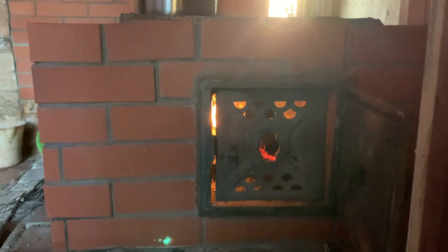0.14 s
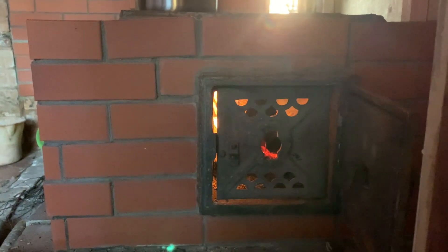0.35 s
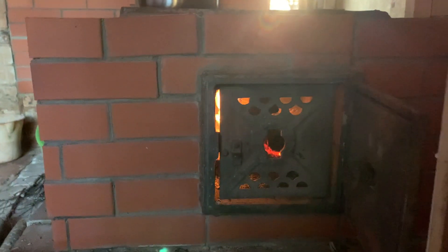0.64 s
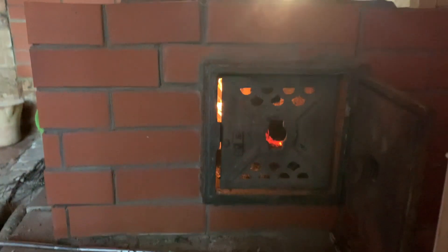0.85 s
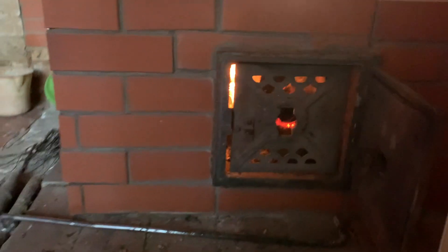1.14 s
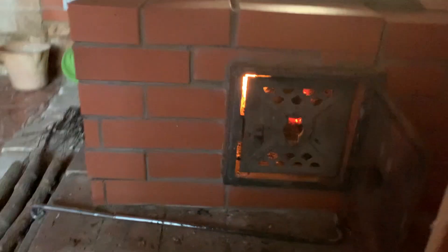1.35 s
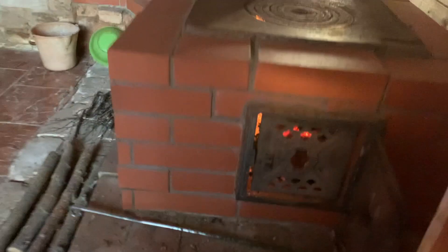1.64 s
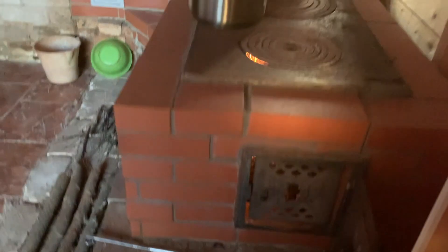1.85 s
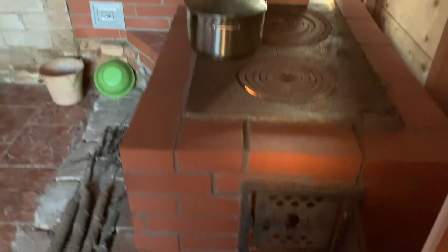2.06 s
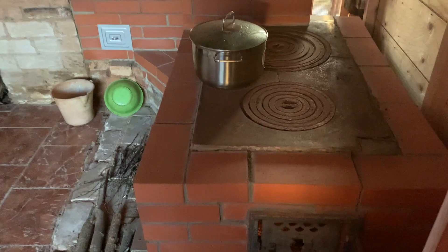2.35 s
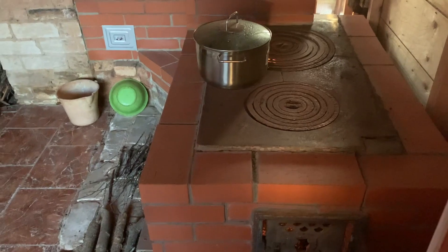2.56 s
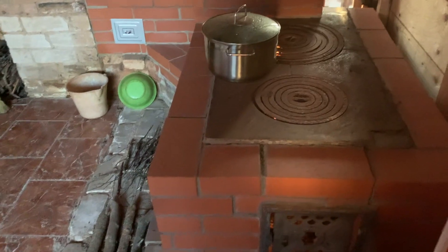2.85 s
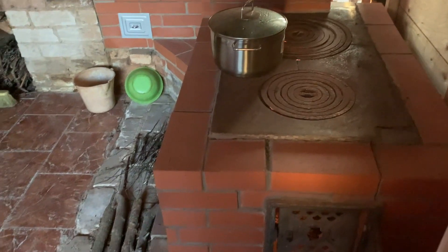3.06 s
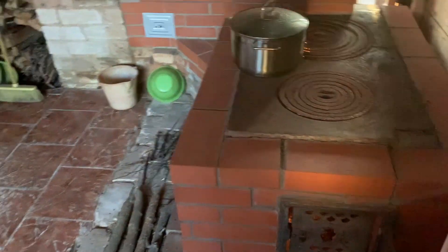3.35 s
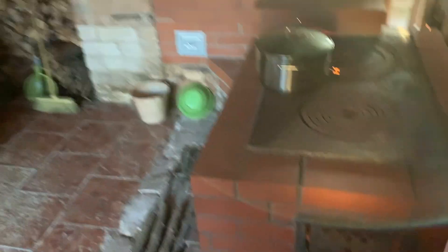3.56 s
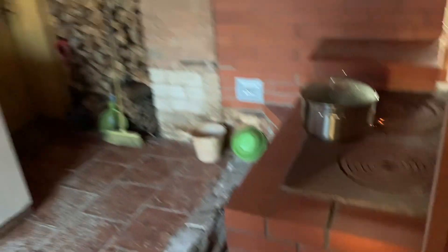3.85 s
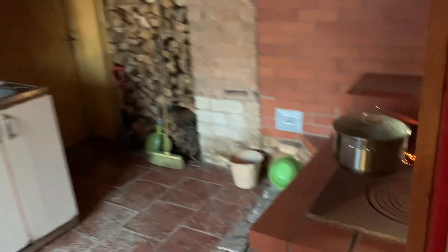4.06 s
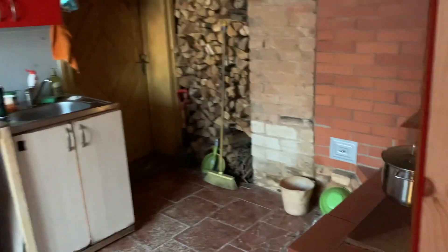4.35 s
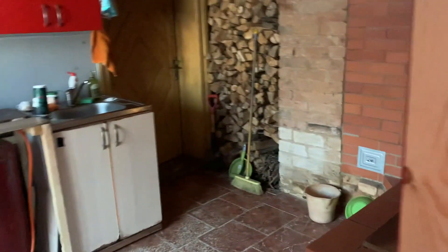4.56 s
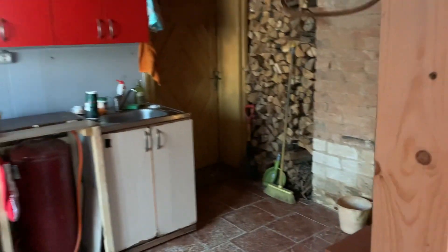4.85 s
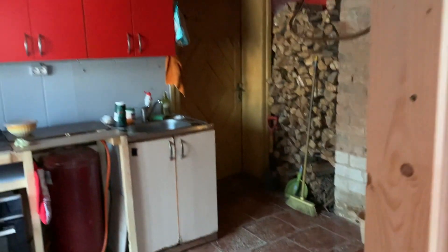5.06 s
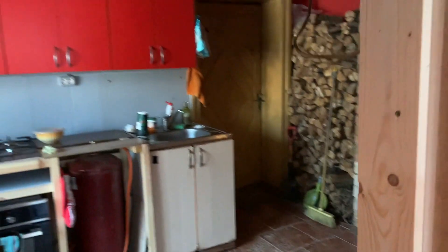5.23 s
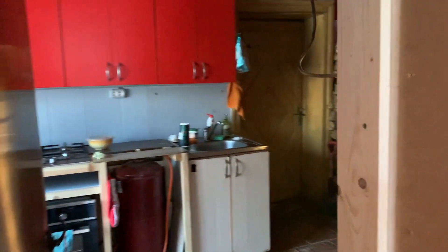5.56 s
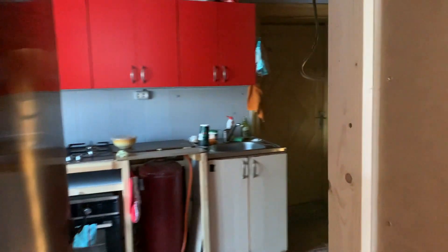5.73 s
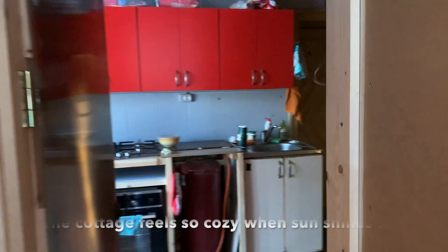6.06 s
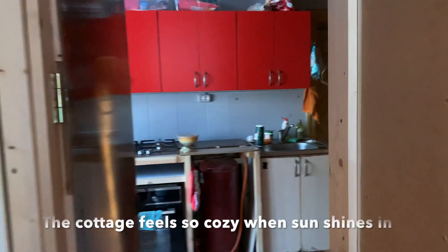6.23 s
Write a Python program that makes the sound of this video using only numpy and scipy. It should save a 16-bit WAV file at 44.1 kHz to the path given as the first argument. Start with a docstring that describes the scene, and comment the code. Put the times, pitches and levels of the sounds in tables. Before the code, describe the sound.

A wood fire burns in a brick kitchen stove, with a low fluttering roar and scattered sharp crackles.

```python
"""A low, fluttering roar with sharp crackles: a wood fire in a brick stove in a small cottage kitchen.
The flames make the air in the firebox and flue (the chimney pipe) ring at several pitches.
Logs puff out gas and snap as their fibres part, over a faint hiss of steam and embers.
Two microphones hear it; the crackles and hiss reach the left one a little earlier."""
import sys
import numpy as np
from scipy import signal
from scipy.fft import rfft, irfft, next_fast_len
from scipy.io import wavfile

SR = 44100
rng = np.random.default_rng(int(sys.argv[2]) if len(sys.argv) > 2 else 0)


def store_pcm(level_fs):
    """Save levels as 16-bit WAV."""
    pcm = np.round(np.clip(level_fs, -1, 1) * 32767).astype(np.int16)
    wavfile.write(sys.argv[1], SR, np.atleast_2d(pcm).T)


N = 282238

# Modes, the pitches at which the air in firebox and flue rings, in a low, a middle and a high group.
# Each row: pitch in Hz, width in Hz, gain in dB.
LOW_MODES = [(63.2, 17.4, -2), (104.1, 12.2, 1), (120.64, 19.9, 0.5), (133.5, 24.3, -1), (150.3, 27, -9.5)]
MIDDLE_MODES = [(208.9, 12.7, -4), (242, 22, -7.5), (294, 10.64, 2), (378.6, 62, -9), (470, 117, -19.5)]
HIGH_MODES = [(522.3, 21, 0), (685, 29, -2.5), (810, 60, -10.5), (1011, 70, -11), (1145, 82, -15.5),
              (1480, 230, -28.5), (2034, 230, -37.5)]


def flue_rumble(level_db):
    """Slowly released heat drives the lowest modes; the walls swallow anything higher."""
    air = ring_modes(rng.standard_normal((2, N)), LOW_MODES)
    common, apart = butter(butter(air, 3, 165), 3, 44, "high")
    apart = signal.lfilter([1, -1], [1], apart)   # the two sides differ more as pitch rises
    return from_db(level_db + 1.42 * drift(hz=9.3)) * stereo(rms_one(common), rms_one(apart), -18.5)


def flame_drone(level_db, burn):
    """The middle modes hum, gently following the flares of burning gas."""
    noise = rng.standard_normal((2, N)) * burn ** 0.42 * from_db(1.98 * drift(hz=37))
    common, apart = rms_one(ring_modes(noise, MIDDLE_MODES))
    spread_db = 18.5 * bump(at_s=4.2, width_s=0.24)   # the drone widens as the listener turns away
    return from_db(level_db) * stereo(common, apart * from_db(spread_db), -12.0)


def flame_flutter(level_db, burn):
    """Flames flutter in the high modes; strong flares reach the highest ones most."""
    noise = rng.standard_normal((2, N))
    out, power = 0, 0
    for k, (hz, width, db) in enumerate(HIGH_MODES):
        brighten_db = 1.1 * (level_db - level_db.mean()) * np.log2(hz / 700)   # louder is brighter
        flicker = rms_one(burn ** (0.76 + 0.5 * np.log2(hz / 500)))
        drive = noise * from_db(level_db + brighten_db) * flicker
        out += (-1) ** k * from_db(db) * resonate(drive, hz, width)
        power += from_db(2 * db) * width * np.pi / SR
    return butter(out, 4, 2500) / np.sqrt(power)


def gas_flares(per_s, fade_s):
    """Pockets of gas catch fire at random and die away over a steady burn."""
    lit = (rng.random(N) < per_s / SR) * np.minimum(rng.exponential(1, N), 2.2)
    return 0.48 + signal.lfilter([1], [1, -np.exp(-1 / (fade_s * SR))], lit)


def flame_lulls():
    """The flames die back briefly: smooth dips of the level, in dB."""
    # Each row: middle of the dip in seconds, depth in dB, length in seconds.
    lulls = [(0.201, 6.5, 0.027), (0.53, 6.5, 0.019), (1.008, 8, 0.035), (1.127, 8, 0.042),
             (1.167, 13, 0.031), (1.318, 17.5, 0.02), (1.429, 17, 0.012), (1.581, 18, 0.015),
             (2.296, 4.5, 0.016), (2.577, 12.5, 0.046), (3.116, 10, 0.054), (3.834, 10.5, 0.036),
             (4.371, 9.5, 0.037), (4.806, 12, 0.064), (5.066, 5.5, 0.11), (5.681, 12, 0.018),
             (5.874, 16, 0.039), (6.305, 10.5, 0.048)]
    return -sum(db * bump(s, length_s / 2) for s, db, length_s in lulls)


def gas_puffs():
    """A log puffs out gas: one push of pressure and a short trail of noise ring in the stove."""
    # Each row: start in seconds, level in dB, treble in dB relative to that level.
    puffs = [(0.0315, -48.5, -6), (0.115, -54.5, -2), (0.283, -52, -23), (0.434, -63.5, 5),
             (0.4935, -55.5, -3), (0.57, -50.5, -22), (0.601, -48.5, -32), (0.646, -57, 0), (0.694, -63, 0),
             (0.887, -51.5, -33), (1.0587, -42.5, -29), (1.128, -53.5, -16), (1.181, -62, 17),
             (1.216, -55.5, 3), (1.347, -48.5, -20), (1.4514, -48.5, -18), (1.598, -48, -9),
             (1.7032, -51, -19), (1.732, -44.5, -27), (1.847, -49, -20), (1.992, -53, -23),
             (2.169, -50.5, -21), (2.226, -58, 5), (2.338, -45.5, -17), (2.369, -49, -32), (2.457, -57, -4),
             (2.504, -47, -15), (2.66, -65, -1), (2.713, -46.5, -7), (2.802, -48, -18), (2.888, -47, -1),
             (2.951, -54, -1), (3.059, -49.5, -2), (3.288, -46, -4.5), (3.339, -50, -31), (3.405, -44.5, 2),
             (3.454, -57, -1), (3.482, -62, -15), (3.571, -55, -10), (3.6, -51.5, 0), (3.643, -50.5, -19),
             (3.7147, -40.5, -13), (3.767, -51.5, -5), (3.869, -53, -11), (3.8996, -44.5, -10),
             (3.971, -42, -9), (3.995, -51.5, -4), (4.047, -50, -18), (4.0957, -53, -24), (4.188, -46, -15),
             (4.275, -51.5, -7), (4.315, -65, 6), (4.3846, -58, -24), (4.43, -52, 0), (4.444, -42, -21),
             (4.537, -53.5, -19), (4.689, -49, -23), (4.73, -53, -16), (4.87, -57, -13), (4.92, -54.5, -26),
             (4.994, -50.5, -9), (5.709, -64, -13), (5.252, -51.5, -25), (5.3425, -51, -4.5),
             (5.399, -60, -10), (5.494, -54, -25), (5.762, -54, -3), (5.808, -48.5, -37),
             (5.8997, -56.5, -22), (6.064, -56, -1), (6.112, -57.5, -17), (6.16, -53, -32),
             (6.202, -55, -21)]
    length = SR // 6
    bursts = rng.standard_normal((len(puffs), 2, length)) * from_db(-60 * np.arange(length) / SR / 0.074)
    bursts[..., 0] += from_db(25.5)   # the opening push
    dull = resonate(bursts, hz=737, width_hz=40) + from_db(6.0) * ring_modes(bursts, HIGH_MODES)
    dull += from_db(-8.5) * band(bursts, 520, 1077)
    low = from_db(8.0) * ring_modes(bursts, MIDDLE_MODES) + from_db(7.5) * ring_modes(bursts, LOW_MODES)
    body = butter(dull + low, 3, 1800)
    treble = butter(band(bursts, 900, 1730), 5, 2500)
    out = np.zeros((2, N))
    for k, (s, db, treble_db) in enumerate(puffs):
        puff = body[k] / peak(dull[k, 0]) + from_db(treble_db) * treble[k] / peak(treble[k, 0])
        add_at(out, s, from_db(db) * puff)
    return out


def wood_snaps():
    """Wood fibres part with a ping, a dry knock and a sizzle. Returns the snaps and a feed for the room."""
    # Each row: start in seconds, level in dB, ping pitch in Hz, knock in dB, knock pitch in Hz,
    # sizzle in dB, length in seconds. Knock and sizzle are relative to the level.
    snaps = [(0.0753, -26, 7230, -26, 2300, -12, 0.021), (0.22, -56.5, 6600, -20, 1750, -38, 0.015),
             (0.246, -58, 7900, -19, 1640, -15, 0.016), (0.278, -50, 6260, -8, 2160, -38, 0.018),
             (0.565, -51, 11200, -27, 1600, -39, 0.022), (0.743, -56.5, 8050, -24, 1630, -53, 0.0095),
             (0.835, -58, 7760, -10, 1790, -33, 0.012), (0.883, -57.5, 8060, -12, 1640, -23, 0.016),
             (0.9175, -37, 8030, -26, 4120, -85, 0.0093), (0.95, -60, 8050, -38, 1650, -45, 0.02),
             (1.1702, -47.5, 7450, -16, 2300, -22, 0.018), (1.182, -55.5, 7000, -1, 1900, -20, 0.044),
             (1.237, -56.5, 6220, -12, 1730, -32, 0.024), (1.264, -64, 6300, -23, 1700, -42, 0.022),
             (1.381, -63, 7950, -23, 1700, -28, 0.018), (1.517, -48, 9000, -36, 1600, 2, 0.014),
             (1.745, -45, 7000, -10, 3380, 0, 0.02), (1.884, -48.5, 7800, -35, 1800, -22, 0.018),
             (2.049, -55, 7360, -35, 1700, -35, 0.027), (2.233, -45.5, 9600, -20, 1700, -3, 0.01),
             (2.245, -43.5, 9000, -23, 2300, -1, 0.0099), (2.336, -60, 8050, -21, 1750, 2, 0.024),
             (2.525, -51, 8500, -27, 1680, -10, 0.013), (2.628, -37, 8170, -26, 4420, -54, 0.01),
             (2.669, -50, 7950, -33, 1990, -10, 0.02), (2.6786, -33.5, 8750, -25, 1650, -7, 0.015),
             (2.703, -40, 8200, -8.5, 1720, -5, 0.016), (2.743, -51, 7100, -25, 1810, -18, 0.016),
             (2.793, -58.5, 7000, -25, 1700, -28, 0.02), (2.9666, -47.5, 6800, -24, 1700, -22, 0.016),
             (3.052, -51.5, 8200, -4, 1650, -15, 0.022), (3.086, -50.5, 8540, -25, 1660, -15, 0.021),
             (3.1874, -45, 8300, -30, 1700, -18, 0.019), (3.2836, -46, 10700, -30, 1690, -33, 0.016),
             (3.385, -58, 9000, -25, 1700, -18, 0.014), (3.4078, -30.5, 7060, -8.5, 1600, -17, 0.016),
             (3.544, -53.5, 8900, -20, 1720, -29, 0.012), (3.6037, -35.5, 8400, -21, 1650, 6, 0.011),
             (3.663, -54, 10000, -25, 2160, -24, 0.0098), (3.783, -51.5, 14600, -9, 1740, -25, 0.015),
             (3.903, -55, 7750, -12, 1740, 5, 0.014), (3.916, -53, 7100, -20, 1740, -2, 0.015),
             (4.172, -59, 10900, -13, 1690, -6, 0.014), (4.4462, -41, 6930, -6, 4290, -25, 0.023),
             (4.4777, -45, 4800, -4, 4700, -11, 0.018), (4.658, -61, 7400, -9, 1630, 2, 0.018),
             (4.666, -57.5, 6800, -4, 2300, -33, 0.047), (4.784, -56.5, 6700, -26, 2260, -42, 0.032),
             (4.863, -54, 15600, -15, 1640, -15, 0.021), (4.881, -58, 7450, -20, 1700, -5, 0.016),
             (4.914, -42, 6100, -21, 4120, -24, 0.021), (4.9837, -54, 6920, -22, 1600, -14, 0.045),
             (4.994, -35, 7100, -41, 1600, -29, 0.015), (5.057, -53, 6830, -31, 1600, -9, 0.013),
             (5.0646, -45.5, 7400, -29, 2260, -10, 0.011), (5.114, -48.5, 10600, -36, 1850, -54, 0.019),
             (5.222, -40, 6900, -6.5, 1650, -16, 0.026), (5.595, -48, 9300, -36, 1680, -26, 0.021),
             (5.6157, -36.5, 8040, -9, 3300, -30, 0.02), (5.666, -44, 10700, -11, 2560, -15, 0.026),
             (5.781, -61, 14900, -16, 1630, -7, 0.016), (5.795, -54, 15400, -21, 1840, -21, 0.02),
             (5.857, -48, 8040, -14, 1700, -14, 0.04), (5.866, -31.5, 9450, -24, 4440, -12, 0.013),
             (5.885, -58, 9000, -24, 3700, 3, 0.016), (5.947, -62, 7900, -25, 1700, -2, 0.016),
             (6.1497, -38.5, 7060, -40, 1600, -26, 0.011), (6.181, -54.5, 7890, -20, 1610, -8, 0.016),
             (6.309, -53.5, 6260, -29, 1740, -9, 0.019)]
    # Ringing of the iron door and the logs. Each row: base pitch in Hz, base width in Hz, base gain in dB.
    door_modes = [(1650, 190, -2), (1900, 120, -6.5), (2300, 124, -4), (2666, 45, 0.5), (3360, 850, -5.5),
                  (3700, 230, 1), (4120, 200, 3.5), (4780, 120, 5.5)]
    out, to_room = np.zeros((2, N)), np.zeros(N)
    t = np.arange(SR // 12) / SR
    noises = rng.standard_normal((len(snaps), 4, len(t)))
    detunes = np.exp(0.045 * rng.standard_normal((len(snaps), len(door_modes))))   # no two logs ring alike
    first_crack = 1 + 0.34 * np.exp(-t / 0.00089)
    for row, noise, shifts in zip(snaps, noises, detunes):
        s, db, hz, knock_db, knock_hz, sizzle_db, length_s = row
        fade = (1 - np.exp(-t / .0002)) * from_db(-60 * (t / length_s) ** 1.4)
        burst, sizzle, *knocks = noise * fade * first_crack
        broad, bite = band(burst, 6050, 13100), band(burst, 2100, 5200)
        broad_db = 4.5 + 0.66 * sizzle_db   # snaps without sizzle are nearly pure pings
        ping = from_db(broad_db) * broad + resonate(burst, hz, 0.07 * hz)
        ping = butter(ping, 4, min(5700, 0.73 * hz), "high")
        sizzle = band(sizzle, 11900, 22000)
        # Modes near the knock's pitch ring most.
        struck = [(mode_hz * shift, 0.96 * width, gain_db - 11 * abs(np.log2(mode_hz / knock_hz)))
                  for (mode_hz, width, gain_db), shift in zip(door_modes, shifts)]
        common, apart = ring_modes(np.array(knocks), struck)
        snap = from_db(knock_db) * stereo(common, apart, -5.5) / peak(common)
        snap += ping / peak(ping) + from_db(-25.5) * bite / peak(bite)
        snap += from_db(sizzle_db) * sizzle / peak(sizzle)
        add_at(out, s, from_db(db) * snap)
        add_at(to_room, s, from_db(db) * (0.48 * snap[0] + broad / peak(broad)))
    return out, to_room


def tiny_crackles(per_s, gain_db):
    """Tiny clicks come at random moments, each ringing briefly at one of ten high pitches."""
    sizes = from_db(5.2 * np.minimum(rng.exponential(1, N), 4))
    clicks = sizes * rng.choice([-1, 1], N) * (rng.random(N) < per_s / SR)
    chosen = rng.integers(0, 10, N)
    return from_db(gain_db) * sum(resonate(clicks * (chosen == k) + 1e-18, hz, 0.14 * hz)
                                  for k, hz in enumerate(np.geomspace(5800, 11000, 10)))


def ember_hiss():
    """Steaming sap and embers make a fine, wavering hiss."""
    # Loudness of the hiss. Each row: time in seconds, level in dB.
    levels = [(0.0, -73.5), (0.46, -76.5), (2.58, -75), (2.76, -72), (3.6, -72.5), (3.83, -75.5),
              (6.4, -76.5)]
    # Tone of the hiss. Each row: frequency in Hz, relative strength in dB.
    tone = [(500, 13), (1500, 9), (3000, 0.5), (5000, 3), (8000, 3), (11000, 4), (12000, 0.5), (14500, -2),
            (16000, -1.5)]
    (level_db,), (tone_hz, tone_db) = curves(levels), np.transpose(tone)
    hz = np.fft.rfftfreq(N, 1 / SR) + 1
    colour = from_db(np.interp(np.log(hz), np.log(tone_hz), tone_db, left=-20))
    common, apart = rms_one(irfft(rfft(rng.standard_normal((2, N))) * colour, N))
    return from_db(level_db + drift(hz=21)) * stereo(common, scattered(apart), -3.0)


def room_echo(x, dull_fade_s=0.15, bright_fade_s=0.046):
    """Firebox and kitchen add a short, dense echo that loses its treble first."""
    t = np.arange(SR // 3) / SR
    common, apart = rng.standard_normal((2, len(t))) * (1 - np.exp(-t / .005))
    tails = stereo(common, scattered(apart) + 0.23 * apart, 0.0)
    dull = butter(tails, 2, 8500)
    tails = dull * from_db(-60 * t / dull_fade_s) + (tails - dull) * from_db(-60 * t / bright_fade_s)
    return signal.fftconvolve(x[None], tails / np.sqrt(np.sum(tails[0] ** 2)), axes=1)[:, :N]


def scattered(x):
    """Keep the lower pitches, which the room scatters so that the two microphones differ."""
    return butter(x, 3, 5500)


def right_later(x, delay_s):
    """The sound reaches the right microphone just after the left."""
    size = next_fast_len(N + 64)
    delay = np.exp(-2j * np.pi * np.fft.rfftfreq(size, 1 / SR) * delay_s)
    return np.array([x[0], irfft(rfft(x[1], size) * delay, size)[:N]])


def stereo(common, apart, apart_db):
    """Left and right share one sound; a second is added on the left and subtracted on the right."""
    return common + from_db(apart_db) * apart * [[1], [-1]]


def ring_modes(x, modes):
    """Ring several modes at once and add them with alternating signs."""
    return sum((-1) ** k * from_db(db) * resonate(x, hz, width) for k, (hz, width, db) in enumerate(modes))


def resonate(x, hz, width_hz):
    """Ring at one pitch; a narrower width rings longer."""
    r = np.exp(-np.pi * width_hz / SR)
    gain = (1 - r * r) / 2
    return signal.lfilter([gain, 0, -gain], [1, -2 * r * np.cos(2 * np.pi * hz / SR), r * r], x)


def butter(x, order, hz, keep="low"):
    """Keep the lows, the highs or a band; a higher order cuts more steeply."""
    return signal.sosfilt(signal.butter(order, hz, keep, fs=SR, output="sos"), x)


def band(x, low_hz, high_hz):
    """Keep what lies between two frequencies."""
    return butter(x, 2, [low_hz, high_hz], "band")


def drift(hz):
    """A smooth random wobble of typical size 1, mostly slower than hz."""
    r = np.exp(-2 * np.pi * hz / SR)
    return rms_one(signal.lfilter([1], [1, -2 * r, r * r], rng.standard_normal(N + SR))[SR:])


def bump(at_s, width_s):
    """A bell curve in time, 1 at its top."""
    return np.exp(-.5 * ((np.arange(N) / SR - at_s) / width_s) ** 2)


def curves(rows):
    """Join timed rows with straight lines: one curve for each column after the time."""
    s, *columns = np.transpose(rows)
    return [np.interp(np.arange(N) / SR, s, column) for column in columns]


def add_at(out, start_s, sound):
    """Mix a sound in at its start time."""
    at = round(start_s * SR)
    out[..., at:at + sound.shape[-1]] += sound[..., :N - at]


def from_db(db):
    """Turn decibels into a gain."""
    return 10 ** (np.asarray(db) / 20)


def rms_one(x):
    """Scale to an average power of 1."""
    return x / np.sqrt(np.mean(x ** 2) + 1e-20)


def peak(x):
    """The largest swing from zero."""
    return np.abs(x).max()


def scene():
    """Mix the roar of the fire with the crackles, their echo and the hiss."""
    # Draught in the flue. Each row: time in seconds, base level of the rumble in dB.
    draught = [(0.0, -34.5), (0.1, -49), (0.14, -36.5), (0.55, -40), (0.6, -33), (0.77, -40), (2.74, -38.5),
               (2.85, -35), (3.64, -40), (3.69, -32), (3.85, -44.5), (3.9, -36), (4.88, -42), (4.97, -35),
               (5.06, -44.5), (5.45, -34), (5.52, -41.5), (5.9, -42.5), (5.95, -35), (6.4, -40.5)]
    # Flame height. Each row: time in seconds, base level of the flutter in dB, and of the drone in dB.
    flame_height = [(0.0, -62, -56), (0.4, -66, -55), (0.7, -61.5, -53.5), (1.3, -63.5, -57),
                    (1.8, -62, -52.5), (2.2, -63, -55.5), (2.8, -61, -52), (3.1, -61.5, -54.5),
                    (3.4, -60.5, -48.5), (3.7, -59.5, -52), (4.0, -67, -65.5), (4.3, -57.5, -58.5),
                    (4.7, -65.5, -55.5), (5.05, -64, -58), (5.35, -65, -52), (5.6, -67.5, -57),
                    (6.0, -65, -53.5), (6.4, -64.5, -59)]
    (rumble_db,), (flutter_db, drone_db) = curves(draught), curves(flame_height)
    drone_db += 0.27 * (rumble_db - rumble_db.mean())   # the drone partly follows the draught
    dip_db = flame_lulls()
    burn = gas_flares(per_s=110, fade_s=0.0049)
    common, apart = flame_flutter(flutter_db + dip_db, burn) + gas_puffs()
    roar = flue_rumble(rumble_db + 0.6 * dip_db) + flame_drone(drone_db + 0.49 * dip_db, burn)
    roar += stereo(common, band(apart, 590, 3000), -7.0)
    snaps, to_room = wood_snaps()
    crackle = snaps + tiny_crackles(per_s=40, gain_db=-56) + from_db(-11.5) * room_echo(to_room)
    return roar + right_later(crackle + ember_hiss(), delay_s=0.000121)


def record(dry):
    """Cut away the very highest treble."""
    return signal.sosfilt(signal.cheby2(12, 70, 17100, fs=SR, output="sos"), dry)


dry = scene()
out = record(dry)
store_pcm(out)
```